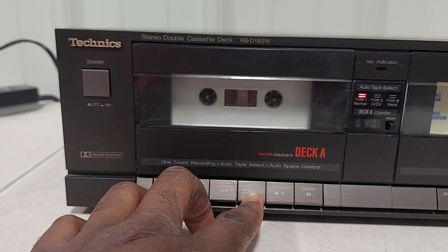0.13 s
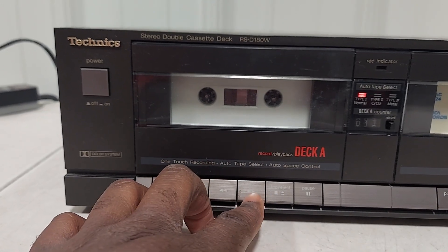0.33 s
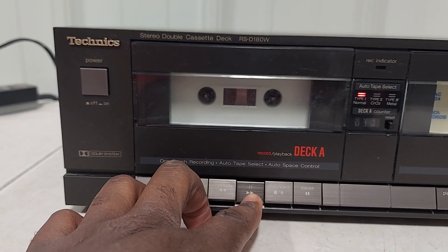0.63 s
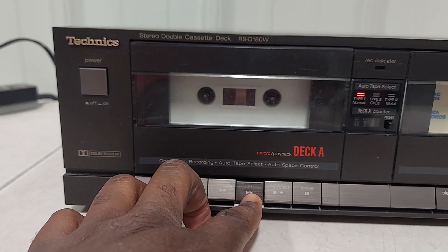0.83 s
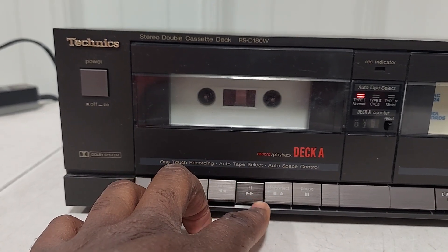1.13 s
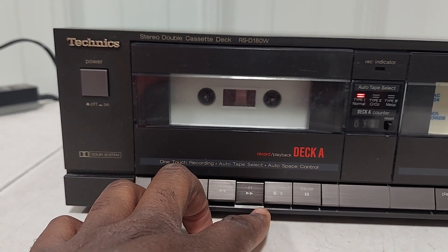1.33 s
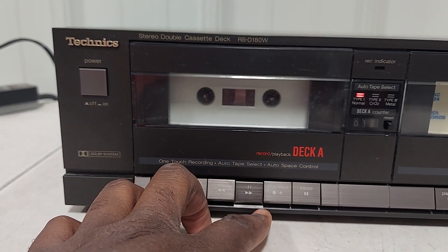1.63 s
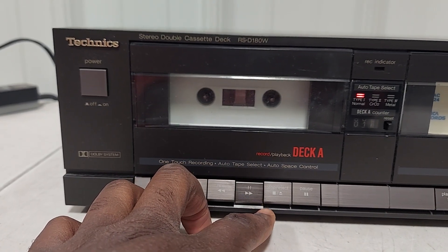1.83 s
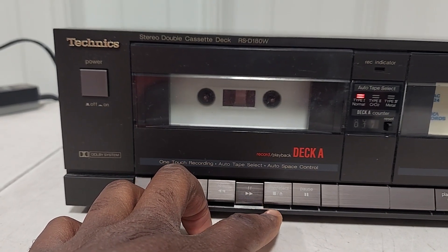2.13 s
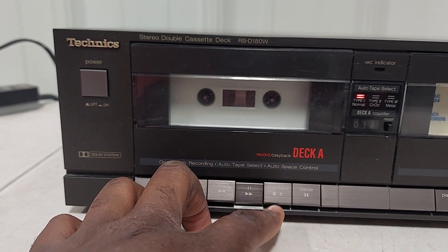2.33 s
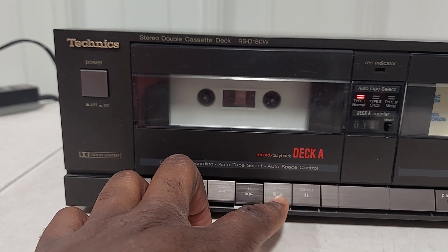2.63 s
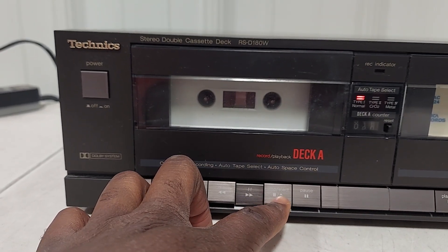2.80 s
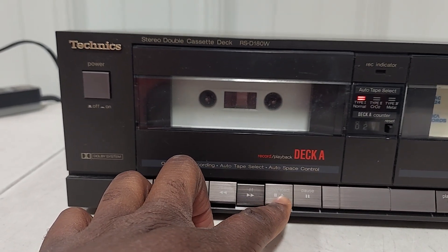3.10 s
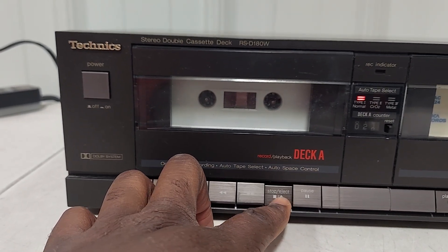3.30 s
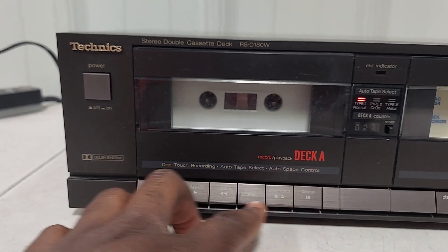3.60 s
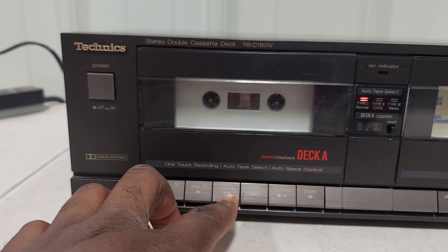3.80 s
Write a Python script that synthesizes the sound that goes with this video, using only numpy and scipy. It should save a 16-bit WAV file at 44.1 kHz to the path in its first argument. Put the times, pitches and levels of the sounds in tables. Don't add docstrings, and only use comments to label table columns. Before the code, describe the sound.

Close up in a quiet indoor room, a plastic deck key latches, small gears and tape whir steadily with faint nail ticks, then a sharp mechanical snap halts everything, leaving skin rub and low hum.

```python
import sys
import numpy as np
from scipy import signal
from scipy.fft import rfft, irfft, next_fast_len
from scipy.io import wavfile
from scipy.ndimage import map_coordinates

SR = 44100
rng = np.random.default_rng(int(sys.argv[2]) if len(sys.argv) > 2 else 0)


def invert_db(level):
    return 10 ** (np.asarray(level, dtype=float) / 20)


def generate_wav(sig):
    pcm = np.round(np.clip(np.atleast_2d(sig).T, -1, 1) * 32767).astype(np.int16)
    wavfile.write(sys.argv[1], SR, pcm)


N = 174195


def unit(x):
    return x / np.sqrt(np.mean(x ** 2) + 1e-20)


def along(points, hz):
    f, v = np.transpose(points)
    return np.interp(np.log(hz + 1), np.log(f + 1), v)


def curve(rows):
    return np.interp(np.arange(N) / SR, *np.transpose(rows))


def wobble(rate):
    return map_coordinates(rng.standard_normal(400), [np.arange(N) * rate / SR], mode="wrap")


def filtered(x, response):
    m = next_fast_len(N + SR // 2)
    return irfft(rfft(x, m) * response(np.fft.rfftfreq(m, 1 / SR)), m)[..., :N]


def shape(points):
    return lambda hz: invert_db(along(points, hz))


def body(peaks):
    return lambda f: sum(invert_db(db) * 1j * f * w / (c * c - f * f + 1j * f * w) for c, w, db in peaks)


def steep(peaks):
    return lambda f: body(peaks)(f) * np.abs(body(peaks)(f)) ** .5


def burst(s, rise, hold, t60):
    t = np.arange(N) / SR - s
    return np.clip(t / rise, 0, 1) * invert_db(-60 * np.clip(t - rise - hold, 0, 2) / t60)


def struck(events, modes):
    blows = np.zeros(N)
    for s, db in events:
        blows[round(s * SR)] = invert_db(db)
    ring = lambda f: sum(invert_db(db) * SR / (2 * np.pi) * c / (c * c - f * f + 2.2j * f / t60) for c, db, t60 in modes)
    return filtered(blows, lambda f: ring(f) * (f / (f - 1j * 95)) ** 2)


# (frequency [Hz], likeness [-1 to 1])
LIKENESS = [(60, 0.91), (180, 0.91), (550, 0.74), (1650, -0.38), (4970, 0.18), (15000, -0.068)]
# (frequency [Hz], left minus right [dB])
LEAN = [(60, -5), (180, -1), (550, 2), (1650, 0), (4970, -4), (15000, 1.5)]


def pair(colour, lean=LEAN, alike=LIKENESS):
    turn = lambda hz: np.arccos(np.clip(along(alike, hz), -1, 1)) / 2
    spread = lambda hz: colour(hz) * [np.cos(turn(hz)), np.sin(turn(hz))]
    mid, side = filtered(rng.standard_normal((2, N)), spread)
    tilt = lambda hz: invert_db(np.outer([.5, -.5], along(lean, hz)))
    return unit(filtered(np.array([mid + side, mid - side]), tilt))


# (time [s], level [dB], rise [s], hold [s], case knock above it [dB])
CONTACTS = [(0.514, -94.5, 0.002, 0.032, 28), (0.643, -45.5, 0.0061, 0.021, 7),
            (0.65, -61, 0.0043, 0.0077, -2), (0.674, -60, .003, 0.015, 9.5),
            (0.701, -55.5, 0.0027, 0.0033, 16.5), (0.7181, -33, 0.00057, 0.0018, -9),
            (0.72, -47, 0.0034, 0.0043, 12), (0.73, -64.5, 0.0041, 0.018, 17.5),
            (3.3251, -26.5, 0.00091, 0.0065, 0), (3.3289, -11.5, 0.00068, 0.0017, -6),
            (3.332, -23.5, 0.0014, 0.0049, -2), (3.35, -45, 0.0025, 0.0039, 16),
            (3.503, -58.5, 0.0026, 0.0063, 11.5), (3.512, -33.5, 0.0041, 0.0098, -5),
            (3.525, -48, 0.0013, 0.0035, 1), (3.942, -86, 0.0028, 0.012, 24.5)]


def contact_strength():
    return sum(invert_db(db) * burst(s, rise, hold, .014) for s, db, rise, hold, knock_db in CONTACTS)


# (frequency [Hz], level per Hz [dB])
LATCH = [(710, -42), (1200, -4.5), (2560, -3), (3950, -5.5), (4860, -10), (5530, -3), (6800, -7.5),
         (12600, -2), (16000, -11)]
# (frequency [Hz], level per Hz [dB])
SPRING_BACK = [(710, -24), (1200, -3.5), (3430, -5), (4750, -10.5), (5530, -7), (14400, -16),
               (16000, -30.5)]
# (frequency [Hz], gain [dB])
SCRAPE = [(4000, -1), (9000, 6.5), (10500, 2.5), (13000, 10.5), (16000, -4.5)]
# (frequency [Hz], left minus right [dB])
KEY_LEAN = [(60, 1), (180, -3), (550, -0.5), (1650, 0.5), (4970, -5.5), (15000, 1.5)]


def key_snaps(strength):
    caught_s, release_s = .69, 3.45
    sample = np.arange(N)
    grit = invert_db(1.4 * wobble(1100))
    snap = pair(shape(LATCH), KEY_LEAN)
    snap = np.where(sample < caught_s * SR, filtered(snap, shape(SCRAPE)), snap)
    return strength * grit * np.where(sample < release_s * SR, snap, pair(shape(SPRING_BACK)))


# (frequency [Hz], level [dB], t60 [s])
LEVERS = [(1677, -18, 0.26), (3000, 10, 0.061), (3280, -18, 0.26), (5450, -15, 0.12), (7219, -34.5, 0.19),
          (8500, -24.5, 0.094)]


def lever_ring(strength):
    levers = body([(hz, 2.2 / min(t60, .025), db) for hz, db, t60 in LEVERS])
    return filtered(strength * rng.standard_normal((2, N)), levers) * invert_db(-6)


# (frequency [Hz], width [Hz], level [dB])
CASE = [(213, 17, -9.5), (322.6, 53, 5), (488, 220, -4.5), (560, 17, -10.5), (632, 110, -1), (692, 30, -2),
        (895, 93, -1.5), (994, 240, -11.5), (1351, 120, -9.5), (1497, 71, -8.5)]
# (frequency [Hz], gain [dB])
GAPS = [(730, 1.5), (800, -8.5), (870, 0.5), (1720, -1), (1900, -11), (2150, -6.5), (2300, -1)]


def case_knocks():
    knock_db, t60_s = -3, 0.02
    knock = sum(invert_db(db + k + knock_db) * burst(s + rise, rise, hold, t60_s) for s, db, rise, hold, k in CONTACTS)
    hollow = lambda f: body(CASE[2:])(f) * invert_db(along(GAPS, f) + 1.394 * np.log2(f / 700 + .01))
    return knock * pair(hollow, KEY_LEAN, [(800, 0.77), (2000, 1.0)])


# (time [s], level [dB])
BLOWS = [(.6515, -45), (.6545, -44), (.658, -46), (.662, -50), (.667, -42), (.676, -46), (.7045, -43),
         (.7195, -45), (.7225, -44), (.7255, -44.5), (2.402, -46), (3.198, -57.5), (3.3255, -32),
         (3.3288, -20.5), (3.331, -31), (3.334, -22.5), (3.35, -35.5), (3.5155, -36.5), (3.519, -50),
         (3.529, -39)]
# (frequency [Hz], level [dB], t60 [s])
PANEL = [(709, 3, .03), (910, -4, .03), (1290, -9, .02), (1573, -8, .025), (1955, -11, .02),
         (2199, -11, .02), (2390, -14, .02), (2762, -14, .025), (5600, -1, .012), (12310, -2, .008)]


def panel_blows():
    return struck(BLOWS, PANEL)


# (time [s], level [dB], length [s])
TICKS = [
    (0.059, -79, .01),
    (0.701, -55, 0.0059),
    (2.339, -68, .004),
    (2.399, -55.5, 0.0077),
    (2.469, -61, 0.0039),
    (3.247, -62.5, 0.0094),
]
# (frequency [Hz], width [Hz], level [dB])
NAIL = [(1000, 600, -11.5), (5480, 1400, 8.5), (7200, 2200, -2)]


def nail_ticks():
    tick = sum(invert_db(db) * burst(s, .001, length, 0.017) for s, db, length in TICKS)
    return tick * pair(body(NAIL))


# (time [s], level [dB])
THUDS = [(0.667, -42), (.675, -43), (.703, -44), (0.726, -42), (.745, -40.5), (3.331, -41), (3.35, -32.5),
         (3.377, -41.5), (3.527, -37), (3.535, -36), (3.563, -39), (3.582, -39.5), (3.617, -46.5)]
# (frequency [Hz], level [dB], t60 [s])
SHELF = [(121.4, -6, 0.24), (144, -4, 0.15), (184, -6, 0.15), (225, -1.5, 0.14), (299, -3.5, 0.11),
         (400, -8.5, .08), (541, -9.5, 0.18)]


def shelf_thuds():
    return struck(THUDS, SHELF) * invert_db([[-1], [1]]) * 1.0


# (time [s], peak level [dB], sung pitch [Hz], length [s])
SURGES = [(0.826, -72, 696.3, 0.039), (0.867, -49, 692, 0.045), (0.978, -60, 685.5, 0.044),
          (1.132, -44, 692, 0.047), (1.241, -44, 696, 0.046), (1.305, -57, 665, 0.047),
          (1.341, -60, 672, 0.044), (1.412, -46, 685.4, 0.041), (1.515, -46, 670.4, 0.045),
          (1.617, -56, 640, 0.05), (1.678, -47, 680, 0.048), (1.704, -47, 689.4, 0.048),
          (1.8, -49, 654, 0.048), (1.944, -44, 682.6, 0.047), (2.019, -56, 646, 0.047),
          (2.072, -50, 712, 0.043), (2.138, -64, 678, 0.037), (2.167, -61, 636, 0.045),
          (2.222, -41.5, 700.7, 0.047), (2.291, -62, 633, 0.044), (2.336, -44.5, 701.4, 0.046),
          (2.404, -57, 698.3, 0.05), (2.49, -41.5, 700, 0.045), (2.604, -52, 703, 0.045),
          (2.647, -59, 672.4, 0.043), (2.715, -57, 700.4, 0.052), (2.76, -47.5, 684, 0.048),
          (2.812, -62, 698, 0.047), (2.925, -55, 675.4, 0.044), (3.026, -43.5, 687.7, 0.043),
          (3.124, -47, 671, 0.045), (3.192, -61, 681, 0.045), (3.227, -52, 692, 0.045),
          (3.293, -46.5, 688.5, 0.045)]


def gear_surges():
    t = np.arange(N) / SR
    early_s, sag_hz = 0.0012, 34.98
    arches = [np.sin(np.pi * np.clip((t + early_s - s) / length, 0, 1)) for s, db, hz, length in SURGES]
    peak_hz = curve([(s + length / 2, hz) for s, db, hz, length in SURGES])
    pitch_hz = peak_hz - sag_hz * (1 - np.clip(sum(arches), 0, 1))
    return pitch_hz, sum(invert_db(row[1]) * arch ** 2 for row, arch in zip(SURGES, arches))


def gear_teeth(pitch_hz):
    mesh_hz, drift, tooth_db, force_db = 331, .03, 4.5, 0.5
    swing = pitch_hz / (2 * mesh_hz) - 1 + drift * wobble(35)
    count = np.floor(np.cumsum(mesh_hz * (1 + swing)) / SR)
    strike_db = tooth_db * rng.standard_normal(N) + force_db * 20 * swing
    teeth = np.diff(count, prepend=0) * invert_db(strike_db)
    tilt = lambda f: invert_db(along(GAPS, f) + 2 * np.log2(f / 700 + .01))
    return unit(filtered(teeth, lambda f: steep(CASE)(f) * tilt(f) / (1 + (f / 1118) ** 20)))


def loose_rattle():
    lift_db = lambda f: 5 / (1 + (1300 / (f + 1)) ** 10)
    return invert_db(-1) * pair(lambda f: steep(CASE)(f) * invert_db(along(GAPS, f) + lift_db(f)))


# (frequency [Hz], width [Hz], level [dB])
SHELL = [(2607, 50, 3.5), (2696, 230, 5), (3030, 120, 4.5), (3325, 250, -3), (3720, 580, 5.5),
         (4585, 340, -1), (5230, 500, 3), (6300, 360, -6), (6950, 1500, 1), (8320, 1200, -8),
         (10830, 2940, 1), (13500, 4680, -13), (15500, 1200, -27.5)]
# (swings per turn [count], size [dB])
HUB = [(2, .9), (3, .9), (5, .7)]


def tape_hiss():
    t = np.arange(N) / SR
    hub_hz = 6.4
    hub_db = sum(db * np.cos(2 * np.pi * k * hub_hz * t + k + 2.7 * wobble(1.5)) for k, db in HUB)
    rub = pair(lambda f: steep(SHELL)(f) * invert_db(along(GAPS, f)))
    return rub * invert_db(-10 + hub_db + 1.1 * wobble(46))


def running(off_s):
    t = np.arange(N) / SR
    on_s, spin_up_s, stop_s = 0.62, 0.063, 0.0063
    return np.clip((t - on_s) / spin_up_s, 0, 1) * np.clip((off_s + stop_s - t) / stop_s, 0, 1)


# (time [s], level [dB])
EFFORT = [
    (.8, -57.5),
    (1.2, -56.5),
    (2, -56.5),
    (2.7, -56.5),
    (3.3, -56),
]


def winding():
    pitch_hz, surge = gear_surges()
    mesh = np.pi * np.cumsum(pitch_hz + 8 * wobble(40)) / SR
    sing = invert_db(-5) * surge * np.sin(2 * mesh)
    whine = invert_db(-12 + 4 * wobble(30)) * np.sin(3 * mesh)
    hiss = tape_hiss()
    works = gear_teeth(pitch_hz) + whine + loose_rattle() + 0.39 * hiss
    return sing + invert_db(curve(EFFORT)) * (running(3.327) * works + 0.72 * running(3.305) * hiss)


# (time [s], level [dB])
REACH = [(0, -80.5), (.08, -78), (.25, -87.5), (.35, -81.5), (.46, -100), (.55, -89), (.63, -67),
         (.68, -93), (.7, -120)]
# (time [s], level [dB])
SLIDE = [(3.4, -120), (3.5, -87), (3.58, -56.5), (3.69, -56.5), (3.75, -62), (3.82, -77.5), (3.86, -84),
         (3.92, -75), (3.95, -69)]
# (frequency [Hz], level per Hz [dB])
SKIN = [(410, -18), (700, -3.5), (2050, -2), (2630, -1), (3790, -8), (4990, 2.5), (6830, -2), (12800, -6.5),
        (16000, -28.5)]


def finger():
    mottle = invert_db(2 * wobble(45))
    return (invert_db(curve(REACH)) + invert_db(curve(SLIDE))) * mottle * pair(shape(SKIN))


# (frequency [Hz], t60 [s])
ECHO = [(300, 0.6), (1000, 0.34), (4000, 0.56), (14000, 0.25)]


def room(x):
    hz, t, z = signal.stft(rng.standard_normal((2, SR // 2)), SR, nperseg=256)
    tail = signal.istft(z * invert_db(-60 * t / along(ECHO, hz)[:, None]), SR, nperseg=256)[1]
    late = np.pad(x, ((0, 0), (200, 0)))
    return signal.fftconvolve(late, tail / np.linalg.norm(tail[0]), axes=1)[:, :N]


# (time [s], level [dB])
OPEN = [
    (0, -55.5),
    (.5, -57.5),
    (.75, -47.5),
    (1.7, -49),
    (3.3, -50.5),
    (3.6, -45),
    (3.95, -54),
]
# (frequency [Hz], level per Hz [dB])
RUMBLE = [(15, -51), (25, -56.5), (43, -15.5), (85, -18.5), (128, -4.5), (168, -7.5), (288, -11),
          (310, -17), (900, -50.5), (1170, -90.5), (1980, -120)]
# (frequency [Hz], level against the room [dB])
HUM = [(59.2, -13.5), (118.4, -9), (141, -10.5), (199, -13)]
# (frequency [Hz], level per Hz [dB])
FLOOR = [(410, -33), (700, -1), (997, -8.5), (3690, -11), (4670, -15), (4800, -9), (7890, -2.5),
         (9600, -13.5), (12200, -5), (16000, -8.5)]


def room_tone():
    t = np.arange(N) / SR
    hum = 0
    for hz, db in HUM:
        level = invert_db(db + 0.75 * wobble(17)) * np.sqrt(2)
        hum = hum + level * np.sin(2 * np.pi * hz * t + 0.72 * wobble(10.0))
    rumble = invert_db(-5.0 + 2 * wobble(22)) * pair(shape(RUMBLE))
    return invert_db(curve(OPEN)) * (rumble + hum * invert_db([[-1], [1]])) + invert_db(-85) * pair(shape(FLOOR))


def scene():
    strength = contact_strength()
    clicks = key_snaps(strength) + lever_ring(strength) + case_knocks() + panel_blows() + nail_ticks()
    echo = invert_db(-15.5) * room(clicks)
    return clicks + echo + shelf_thuds() + winding() + finger() + room_tone()


# (frequency [Hz], gain [dB])
MIC = [(1720, 0.5), (2000, 1.5), (2300, 2), (8600, 1), (9400, -4), (10300, -2.5), (15900, 1), (16050, -48)]


def microphone(x):
    lead_s = .00012
    ports = lambda hz: invert_db(along(MIC, hz)) * np.exp(1j * np.pi * np.outer([1, -1], hz) * lead_s)
    return filtered(1.089 * np.tanh(x / 1.114), ports)


def roll_off(x):
    return signal.sosfilt(signal.butter(12, 16890, fs=SR, output="sos"), x)


def record(dry):
    mix = microphone(dry)
    return roll_off(mix)


dry = scene()
out = record(dry)
generate_wav(out)
```